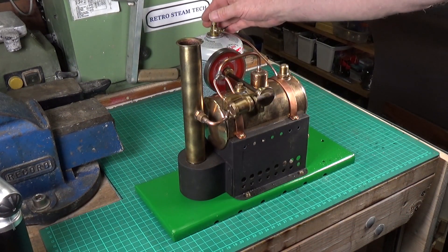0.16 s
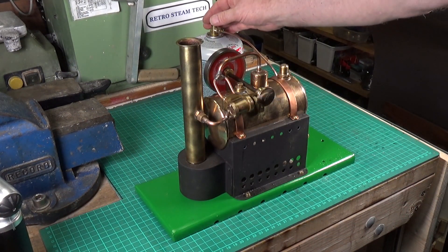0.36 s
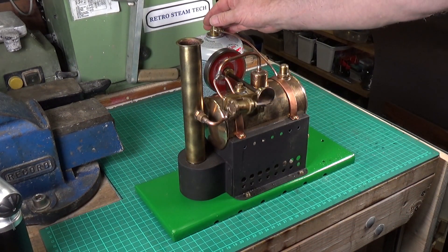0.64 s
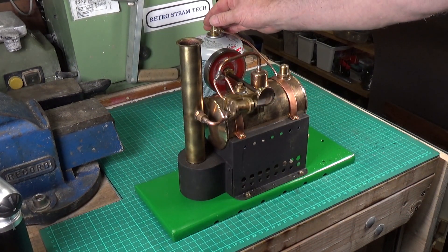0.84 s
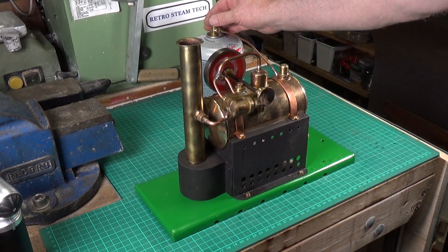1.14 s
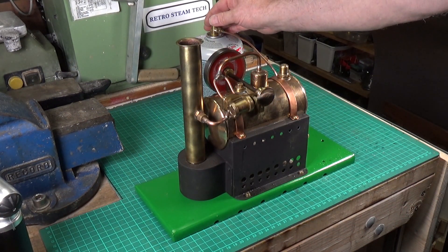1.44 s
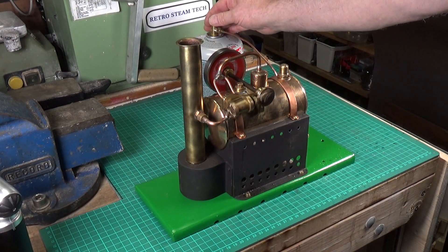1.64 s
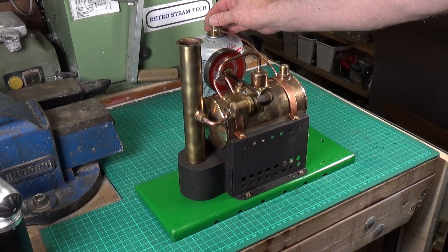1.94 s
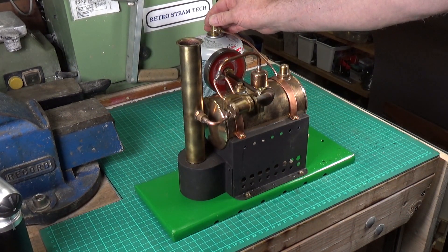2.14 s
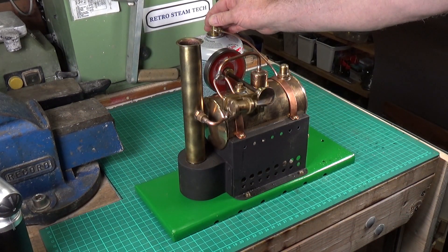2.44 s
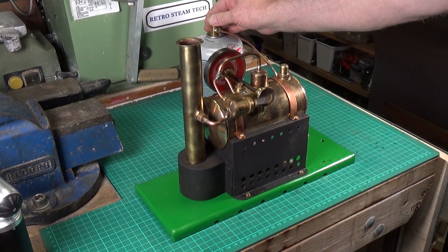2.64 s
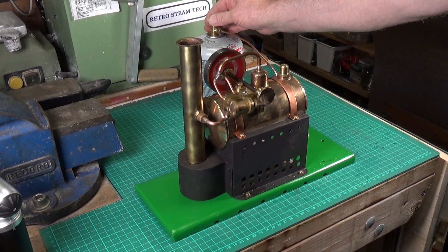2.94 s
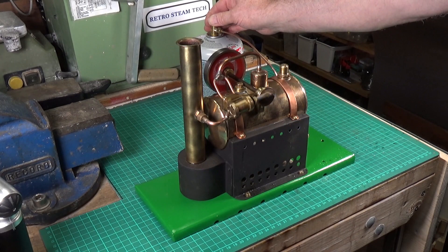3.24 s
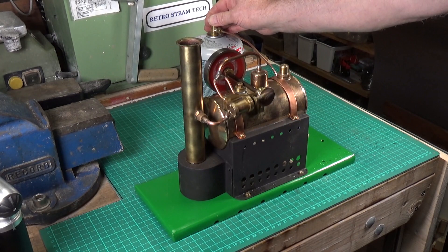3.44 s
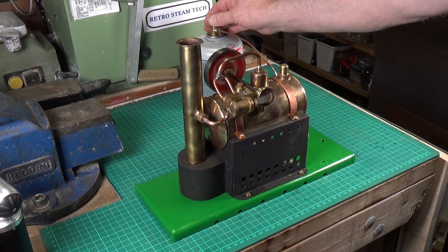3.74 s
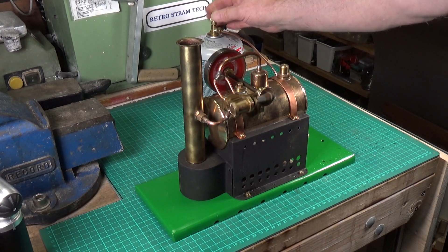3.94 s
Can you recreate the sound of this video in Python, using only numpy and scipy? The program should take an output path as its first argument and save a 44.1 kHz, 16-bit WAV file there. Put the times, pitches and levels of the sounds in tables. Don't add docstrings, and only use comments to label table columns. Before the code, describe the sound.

A small brass steam engine runs fast and even on a workbench, clattering metallic knocks and hissing puffs growing gradually louder.

```python
import sys
import numpy as np
from scipy import signal
from scipy.fft import rfft, irfft
from scipy.io import wavfile
from scipy.ndimage import uniform_filter1d

SR = 44100
rng = np.random.default_rng(int(sys.argv[2]) if len(sys.argv) > 2 else 0)


def wav_out(sig):
    wavfile.write(sys.argv[1], SR, np.round(np.clip(np.atleast_2d(sig).T, -1, 1) * 32767).astype(np.int16))


def invert_db(x):
    u = np.asarray(x, float) / 20
    return 10 ** u


N = 179841

# time in seconds, hardness of the blow in dB,
# dryness of the sliding parts in dB, shaking of the base in dB.
RUNNING = [
    (0, -3, 1, -1),
    (.5, -0.5, -0.5, 0.5),
    (1, -1, 0, 0),
    (1.5, -0.5, 3, 0),
    (2, -1, 4.5, 0.7),
    (2.5, 0.5, 0.5, 0.5),
    (3, -1.5, 2, 0.6),
    (3.3, 1.5, 1.5, 0.5),
    (3.6, 1, 2.5, 0.5),
    (4.08, -0.5, 2.5, 2.5),
]
# frequency in Hz, level in dB, t60 in seconds.
CYLINDER = [(2249, -18.0, 0.169), (2306, 3.5, 0.02), (2416, -5.2, 0.043), (2490, -8.8, 0.097),
            (2608, -4.1, 0.041), (2635, -19.7, 0.122), (3111, -6.5, 0.042), (3211, -12.3, 0.06),
            (3255, -4.3, 0.024), (3297, -15.5, 0.073), (3360, -10.5, 0.041), (3406, -21.1, 0.18),
            (3502, -15.3, 0.067), (3568, -11.1, 0.053), (3658, -11.7, 0.046), (3972, -4.9, 0.033),
            (4039, -13.3, 0.056), (4133, -6.2, 0.027), (4259, -14.0, 0.032), (4329, -7.7, 0.039),
            (4424, -11.2, 0.024)]
# frequency in Hz, level in dB, t60 in seconds.
CRANK = [(210, -16.7, 0.21), (236, -17.3, 0.21), (377, -13.7, 0.208), (406, -11.3, 0.19), (583, -7.7, 0.16),
         (626, -14.1, 0.117), (790, -12.5, 0.21), (911, -14.0, 0.21), (961, -9.5, 0.109),
         (1008, -1.2, 0.078), (1037, -13.0, 0.119), (1080, -8.1, 0.144), (1109, -9.7, 0.21),
         (1154, 0.3, 0.137), (1189, 9.6, 0.081), (1491, 5.6, 0.032), (1746, -2.8, 0.069),
         (1800, -12.5, 0.127), (1879, -6.5, 0.052), (2113, -17.2, 0.21), (2415, -18.8, 0.11),
         (2449, -7.1, 0.047), (2781, -4.5, 0.023), (2886, -8.3, 0.025), (3736, -18.3, 0.104),
         (3781, -7.9, 0.028), (3874, -17.4, 0.063), (3992, -27.3, 0.21), (4244, -17.3, 0.075),
         (4956, -16.0, 0.025)]
VALVE_S = -.009


def evened(x):
    return x / np.sqrt(np.mean(x ** 2) + 1e-20)


def noise():
    return rng.standard_normal(N)


def read(points, hz):
    f, value = np.transpose(points)
    return np.interp(np.log(hz + 1), np.log(f + 1), value)


def coloured(x, points):
    gain = invert_db(read(points, np.fft.rfftfreq(len(x), 1 / SR)))
    return irfft(rfft(x) * gain, len(x))


def resonate(x, hz, width):
    turn = np.exp(2j * np.pi * hz * np.arange(len(x)) / SR)
    r = np.exp(-np.pi * width / SR)
    return (turn * signal.lfilter([1], [1, -2 * r, r * r], x / turn)).real


def wander(seconds):
    size = round(seconds * SR)
    return evened(uniform_filter1d(uniform_filter1d(noise(), size), size))


def bassless(x):
    return signal.sosfilt(signal.butter(4, 350, "high", fs=SR, output="sos"), x)


def ring(modes, rise=0.00098):
    t = np.arange(SR // 3) / SR
    dying = sum(invert_db(db - 60 * t / t60) * np.sin(2 * np.pi * hz * t) for hz, db, t60 in modes)
    return (1 - np.exp(-t / rise)) * dying


def each_turn(s, sound, db, after_s=0.):
    blows = np.zeros(N + 2 * SR)
    blows[SR + np.round((s + after_s) * SR).astype(int)] = invert_db(db)
    return signal.oaconvolve(blows, sound)[SR:SR + N]


def turns():
    # time in seconds, turns per second.
    speed = [
        (0, 15.606),
        (.7, 15.685),
        (1.8, 15.617),
        (2.3, 15.514),
        (2.9, 15.467),
        (3.45, 15.533),
        (4.08, 15.481),
    ]
    first_knock_s = .03755
    t = np.arange(-SR // 10, N + SR // 10) / SR
    angle = np.cumsum(np.interp(t, *np.transpose(speed))) / SR
    angle -= np.interp(first_knock_s, t, angle)
    s = np.interp(np.arange(np.ceil(angle[0]), angle[-1]), angle, t)
    play = rng.standard_normal((len(s), 2))
    blow_db = -29 + 1.5 * s + 0.19 * play[:, 0]
    tap_db = np.interp(s, [1.5, 3], [-3, 0]) + 1.4 * play[:, 1]
    return s, blow_db, tap_db


def knocks(s, blow_db, tap_db):
    # frequency in Hz, level in dB, t60 in seconds.
    piston = [(1101, 9.2, 0.036), (1281, 1.6, 0.022), (1461, -0.5, 0.037), (1592, 1.5, 0.032),
              (1772, 1.3, 0.032), (1979, -10.1, 0.114), (1996, -4.6, 0.08), (2011, -13.6, 0.125),
              (2025, -18.6, 0.168), (2157, -15.3, 0.146)]
    base = [(198, -20.7, 0.267), (253, -9.5, 0.237), (295, -14.1, 0.253), (356, -18.9, 0.31),
            (364, -12.3, 0.276), (456, -3.5, 0.087), (566, -20.0, 0.31), (595, -13.9, 0.15),
            (692, -6.6, 0.027), (757, -7.8, 0.142), (787, -10.8, 0.292), (903, -10.2, 0.22)]
    bench = [(105, -38, 0.41), (128, -25.5, 0.52), (154.2, -22.5, 0.28), (219.5, -28, 0.51),
             (575.8, -15.5, 0.27), (590.7, -14.5, 0.26), (640, -19.5, 0.19)]
    rebound = [(313, -16.4, 0.13), (460, -16.9, 0.198), (850, -2.9, 0.053), (952, -5.0, 0.098),
               (1147, -9.4, 0.187), (1208, -4.5, 0.109), (1335, -0.4, 0.015), (1756, -11.6, 0.058),
               (2116, -14.8, 0.136)]
    rod = [(857, -9.3, 0.056), (1054, -5.5, 0.079), (1195, -9.8, 0.114)]
    valve = [(201, -18.8, 0.16), (318, -9.9, 0.096), (484, -9.7, 0.03), (734, -10.2, 0.14),
             (795, -4.1, 0.078)]
    piston_s, crank_s, rebound_s, rod_s = .0006, .0032, .0191, .044
    play = rng.standard_normal((len(s), 3))
    time_s, hardness_db, _, shaking_db = np.transpose(RUNNING)
    hard_db = np.interp(s, time_s, hardness_db)
    shake_db = np.interp(s, time_s, shaking_db)
    bench_db = 1.46 * (s - 2)
    out = each_turn(s, ring(piston), blow_db + 0.14, piston_s)
    out += each_turn(s, ring(base), blow_db + 0.45 + shake_db, piston_s)
    out += each_turn(s, ring(bench), blow_db + bench_db, piston_s)
    out += each_turn(s, ring(CYLINDER), blow_db + 0.05 + hard_db + 0.21 * play[:, 2], piston_s)
    out += each_turn(s, ring(CRANK), blow_db + 0.19, crank_s)
    out += each_turn(s, ring(rebound), blow_db + 1.2 + 1.0 * play[:, 0], rebound_s)
    out += each_turn(s, ring(rod), blow_db + 2.5 + 0.17 * play[:, 1], rod_s)
    out += each_turn(s, ring(valve), blow_db + 3.0 + 0.9 * tap_db, VALVE_S)
    return out


def scatter(s, blow_db):
    # frequency in Hz, level in dB.
    spectrum = [(150, -12), (500, -98), (1000, -6.5), (1650, -21), (2000, -15.5), (3100, -16.5),
                (4400, -21), (5000, -29), (6300, -17), (9500, -28.5), (12500, -37), (14000, -42)]
    # frequency in Hz, t60 in seconds.
    decay = [(200, 0.77), (1000, 0.34), (3000, 0.27), (6000, 0.062), (12000, 0.046)]
    hz, t, z = signal.stft(rng.standard_normal(SR // 3), SR, nperseg=256)
    level_db = read(spectrum, hz)[:, None] - 60 * t / read(decay, hz)[:, None]
    tail = signal.istft(z * invert_db(level_db), SR)[1]
    tail *= (1 - np.exp(-np.arange(len(tail)) / SR / .0015)) ** 2
    return each_turn(s, bassless(tail), blow_db + 15.5)


def chatter(s, blow_db):
    u = np.arange(SR // 10) / SR
    jolts = each_turn(s, np.exp(-u / 0.0098), blow_db - 43) * noise()
    return signal.oaconvolve(jolts, ring(CRANK) + invert_db(2) * ring(CYLINDER))[:N]


def echoed(sound):
    # delay in seconds, level in dB.
    echoes = [(.0035, -15), (.0058, -1), (.0066, -7), (.008, -3), (.011, -7), (.0138, -40), (.0168, 1),
              (.0195, -5)]
    taps = np.zeros(SR // 20)
    delay_s, db = np.transpose(echoes)
    taps[np.round(delay_s * SR).astype(int)] = invert_db(db)
    reflected = signal.oaconvolve(sound, taps)[:len(sound)]
    return sound + coloured(reflected, [(5000, 3.5), (9000, -3.5), (12000, -9)])


def port_ticks(s, blow_db, spread):
    # frequency in Hz, level in dB, t60 in seconds.
    port = [(5550, -17, 0.0034), (6480, -11.5, 0.0063), (7690, -11, 0.0067), (9000, -11.5, 0.004),
            (10950, -9, 0.0059), (11630, -5.5, 0.0055), (12560, -4.5, 0.0066), (13500, -7, .006),
            (15300, -14, .006)]
    snap = ring(port, rise=.0002)
    tick = each_turn(s, echoed(snap), blow_db + 1.2 * spread[:, 0], -.0005)
    tick += each_turn(s, snap, blow_db - 11 + 3 * spread[:, 1], VALVE_S)
    return tick * (1 + 0.083 * evened(uniform_filter1d(noise(), size=6)))


def puffs(s, blow_db, spread):
    # frequency in Hz, level in dB.
    puff_spectrum = [(300, -72), (900, -77), (2000, -65), (3500, -14), (6000, -21), (9000, -21.5),
                     (12000, -28.5), (15500, -44)]
    u = np.arange(SR // 10) / SR
    burst = (1 - np.exp(-u / .0015)) * np.exp(-u / .016)
    flow = each_turn(s, burst, blow_db + 12 + 1.2 * spread[:, 1])
    return flow * coloured(noise(), puff_spectrum)


def sliding(s):
    # frequency in Hz, width in Hz, level in dB, swell over the turn in dB,
    # loudest point as a share of the turn.
    slide = [(799, 83, -28, 4.5, 0.34), (882, 46, -24.5, 2, 0.23), (1962, 160, -24.5, 8, 0.19),
             (3090, 175, -27, 3.5, 0.94), (3710, 190, -33, 11, 0.11), (5490, 420, -44, 12.5, 0.94),
             (8000, 400, -42.5, 8.5, 0.85), (10340, 190, -36, 0, 1), (14230, 750, -38, 7, 0.79),
             (15600, 400, -47, 4, 1)]
    t = np.arange(N) / SR
    share = np.interp(t, s, np.arange(len(s)))
    time_s, _, dryness_db, _ = np.transpose(RUNNING)
    dry_db = np.interp(t, time_s, dryness_db)
    grit = invert_db(2.0 * evened(uniform_filter1d(noise(), 90)))
    sung = np.zeros(N)
    for hz, width, db, swell_db, at in slide:
        level_db = db + 0.63 * wander(0.076) + swell_db * np.cos(2 * np.pi * (share - at))
        sung += invert_db(level_db) * evened(resonate(noise(), hz, width))
    return invert_db(dry_db) * grit * sung


def wash():
    # frequency in Hz, level in dB per Hz.
    wash_spectrum = [(25, -12), (55, -5), (90, -13), (160, -5.5), (300, -18), (600, -1.5), (900, -0.5),
                     (1600, -15), (2500, -20), (5000, -15), (9000, -23), (13000, -24), (16000, -30)]
    return invert_db(-15.5) * evened(coloured(noise(), wash_spectrum))


def steam(s, blow_db):
    pressure = invert_db(np.interp(np.arange(N) / SR, s, blow_db))
    spread = rng.standard_normal((len(s), 2))
    blown = port_ticks(s, blow_db, spread) + puffs(s, blow_db, spread)
    return blown + pressure * (sliding(s) + wash())


def spits():
    # time in seconds, level in dB, length in seconds.
    drops = [
        (0.323, -50, .016),
        (1.752, -47, .004),
        (2.233, -36, .003),
        (3.465, -38, .012),
        (3.808, -41, .008),
    ]
    # frequency in Hz, level in dB.
    spit_spectrum = [(2500, -30), (5000, 1), (9000, 4), (14000, -6)]
    t = np.arange(N) / SR
    gate = sum(invert_db(db) * np.exp(-(2 * (t - at) / length) ** 2) for at, db, length in drops)
    return gate * evened(coloured(noise(), spit_spectrum))


def squeaks():
    # time in seconds, frequency in Hz, level in dB, length in seconds.
    cries = [
        (1.016, 897.5, -31, .055),
        (1.115, 800, -36, .05),
        (1.114, 3100, -38, .025),
        (2.012, 855, -34, .04),
        (3.535, 3070, -38, .015),
        (3.618, 3070, -36, .022),
        (3.66, 3070, -39, .025),
        (3.75, 3070, -39, .02),
        (3.89, 218, -38, .06),
    ]
    t = np.arange(N) / SR
    out = np.zeros(N)
    for at, hz, db, length in cries:
        swell = np.exp(-(2 * (t - at) / length) ** 2 * 2)
        out += invert_db(db) * swell * np.sin(2 * np.pi * hz * t)
    return out


def far_motor():
    # start in seconds, length in seconds, first and last frequency in Hz, level in dB.
    drone = [
        (-.05, 1.18, 83.2, 92.1, -36.5),
        (1.736, 0.45, 91, 80.2, -44.5),
        (2.45, 0.5, 77, 79, -53),
    ]
    rise_s, fade_db_per_s = 0.041, 14.5
    t = np.arange(N) / SR
    out = np.zeros(N)
    for start, length, first_hz, last_hz, db in drone:
        end = start + length
        turn = 2 * np.pi * np.cumsum(np.interp(t, [start, end], [first_hz, last_hz])) / SR
        gate = np.clip(np.minimum(t - start, end - t) / rise_s, 0, 1)
        level = invert_db(db - fade_db_per_s * (t - start))
        out += gate * level * (np.sin(turn) + invert_db(-9) * np.sin(2 * turn))
    return out


def mains_hum():
    # frequency in Hz, width in Hz, level in dB.
    hum = [(102, 11, -58), (150, 15, -57), (299.4, 6, -64.5)]
    return sum(invert_db(db) * evened(resonate(noise(), hz, width)) for hz, width, db in hum)


def scene():
    s, blow_db, tap_db = turns()
    engine = knocks(s, blow_db, tap_db) + scatter(s, blow_db) + chatter(s, blow_db)
    engine += steam(s, blow_db) + spits() + squeaks()
    return (engine + far_motor() + mains_hum())[None]


def band_limit(x):
    return signal.sosfilt(signal.butter(12, 15830, fs=SR, output="sos"), x)


def record(dry):
    heard = signal.sosfilt(signal.butter(2, 40, "high", fs=SR, output="sos"), dry)
    edge = signal.firwin(401, 15900, window=("kaiser", 9), fs=SR)
    mix = signal.oaconvolve(heard, edge[None], "same")
    return band_limit(mix)


dry = scene()
out = record(dry)
wav_out(out)
```